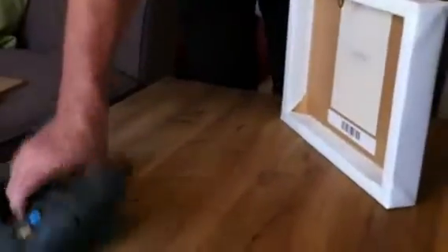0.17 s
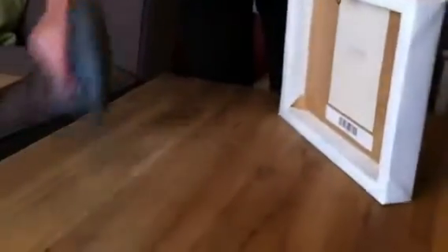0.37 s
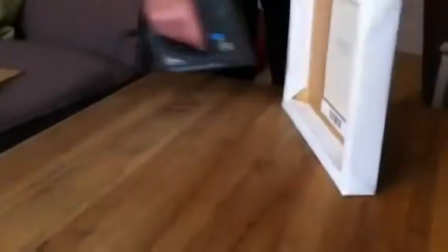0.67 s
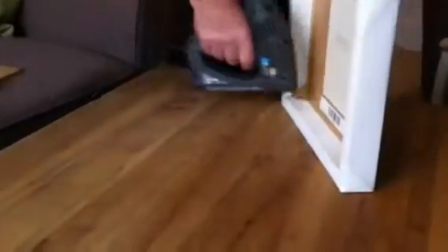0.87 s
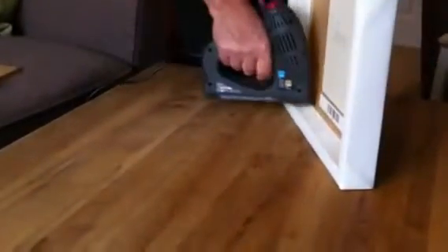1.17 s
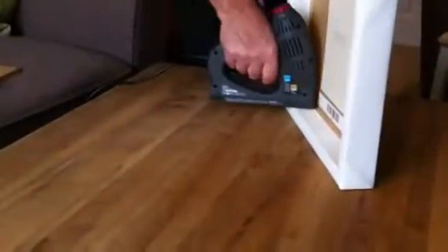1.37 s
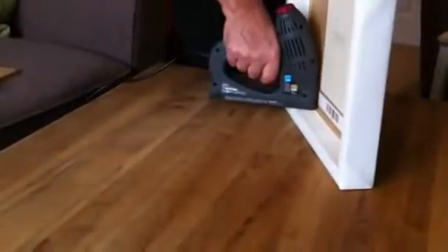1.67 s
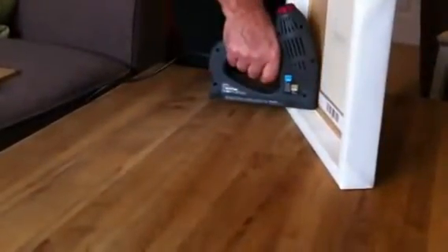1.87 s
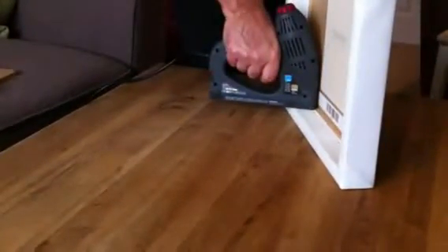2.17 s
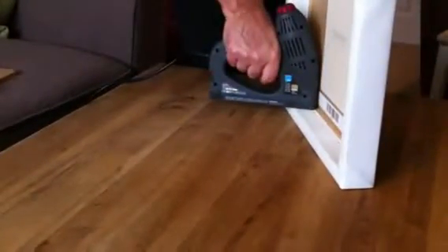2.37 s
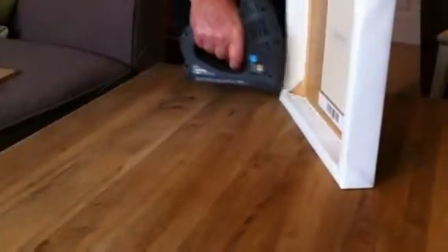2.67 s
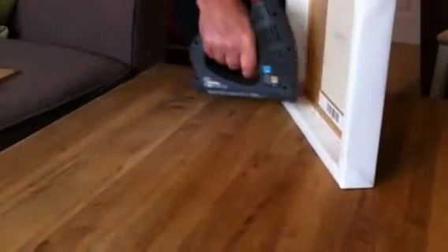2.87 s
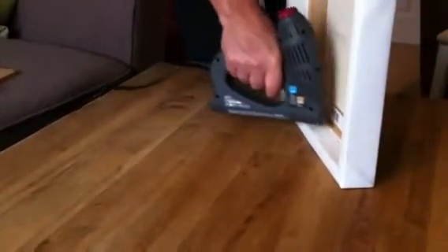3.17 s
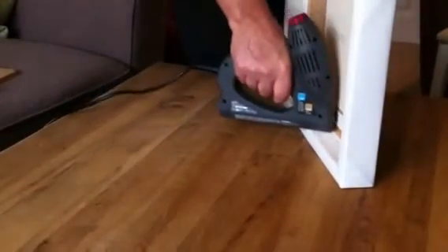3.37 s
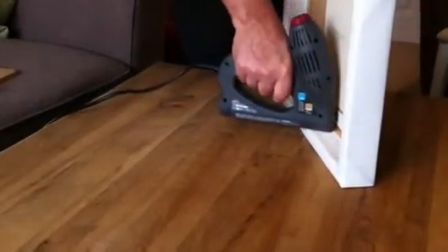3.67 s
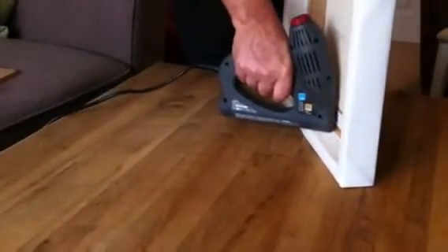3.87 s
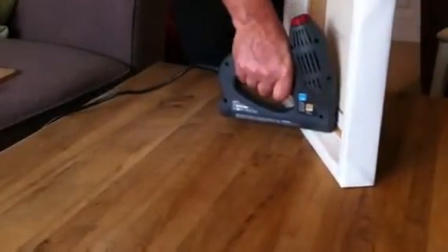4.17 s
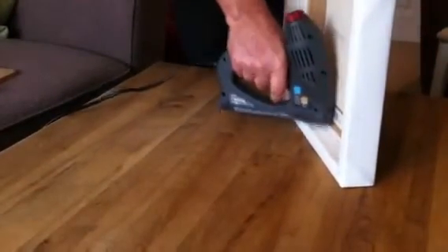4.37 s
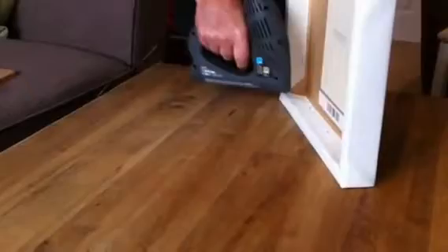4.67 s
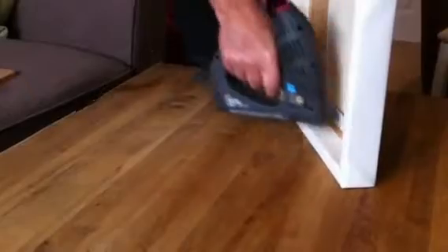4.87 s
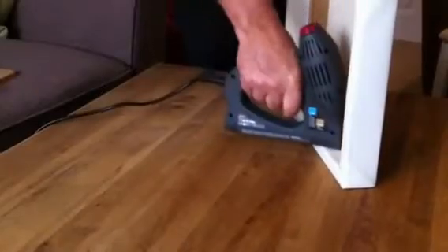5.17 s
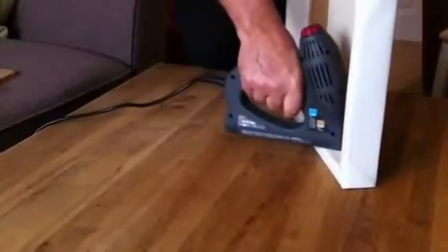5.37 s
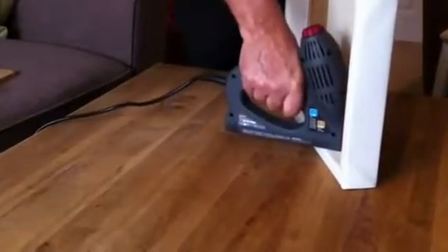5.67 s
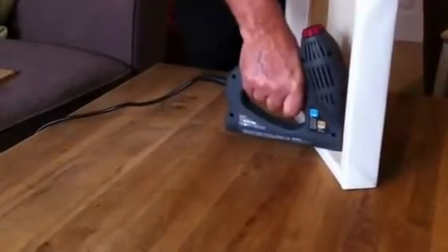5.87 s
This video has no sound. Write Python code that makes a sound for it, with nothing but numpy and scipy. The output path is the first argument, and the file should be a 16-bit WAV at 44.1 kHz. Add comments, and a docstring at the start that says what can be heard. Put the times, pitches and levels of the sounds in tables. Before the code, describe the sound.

An electric staple gun scrapes and knocks off a wooden table, bumps onto a canvas frame, and fires two sharp, loud cracks in a quiet room.

```python
"""Over room air and a faint drone, an electric staple gun judders off a wooden table and knocks once.
A canvas frame then rubs into place: coloured noise. Plastic clacks and switch ticks are short noise bursts.
Three times the nose bumps onto the frame and a two-tone hum follows. In the first two, a staple is fired:
cracks of decaying noise with room echoes, thuds of short low swings, rings of decaying sines.
The recorder's gain ducks when the sound is loud and creeps back."""
import sys
import numpy as np
from scipy import signal
from scipy.fft import rfft, irfft
from scipy.io import wavfile
from scipy.ndimage import uniform_filter1d

SR = 44100
rng = np.random.default_rng(int(sys.argv[2]) if len(sys.argv) > 2 else 0)


def master(y):
    """Save y as 16-bit WAV."""
    cut = np.clip(np.atleast_2d(y).T, -1, 1)
    pcm = np.round(cut * 32767)  # scale
    wavfile.write(sys.argv[1], SR, pcm.astype(np.int16))


N = 265967
TIME_S = np.arange(N) / SR
AGE_S = TIME_S[:SR * 3 // 5]  # time since a blow


def undb(db):
    """Decibels to amplitude gain."""
    return 10 ** (np.asarray(db) / 20)


def unit_energy(x):
    """Scale to an energy of one."""
    return x / np.sqrt(np.sum(x ** 2))


def unit_rms(x):
    """Scale a full-length signal to an rms of one."""
    return unit_energy(x) * np.sqrt(N)


def fade(t60_s):
    """Exponential decay that loses 60 dB in t60_s."""
    return np.exp(-np.log(1000) * AGE_S / t60_s)


def at(points, hz):
    """Read (Hz, value) points on a log-frequency axis."""
    point_hz, value = np.transpose(points)
    return np.interp(np.log(hz + 1), np.log(point_hz), value)


def colour(x, points, size=4096):
    """Minimum-phase filter with the given (Hz, dB) shape, by folding its cepstrum to be causal."""
    gain = undb(at(points, np.fft.rfftfreq(size, 1 / SR)))
    cepstrum = irfft(np.log(gain))
    cepstrum[1:size // 2] *= 2
    cepstrum[size // 2 + 1:] = 0
    impulse = irfft(np.exp(rfft(cepstrum)))
    return signal.fftconvolve(x, impulse)[:len(x)]


def add(track, start_s, sound):
    """Mix a sound into the track at a time."""
    i = int(start_s * SR)
    track[i:i + len(sound)] += sound[:N - i]


# Room decay. Each row: frequency in Hz, t60 in s.
ROOM_DECAY = [(100, 0.45), (500, .32), (1500, 0.27), (4000, 0.27), (8000, 0.23), (14000, 0.24)]


def room(gap_s, build_s):
    """Echoes of one blow: after a short gap they thicken, then each band decays at its own rate."""
    f = np.fft.rfftfreq(len(AGE_S), 1 / SR)
    noise = rfft(rng.standard_normal(len(AGE_S)))
    centres_hz = np.geomspace(100, 16000, 7)
    tail = 0
    for hz, share in zip(centres_hz, np.eye(len(centres_hz))):
        band = irfft(noise * np.interp(f, centres_hz, share), len(AGE_S))
        tail = tail + band * fade(at(ROOM_DECAY, hz))
    return unit_energy(tail * np.clip((AGE_S - gap_s) / build_s, 0, 1))


def dull_db(hz, bright_hz):
    """A softer contact loses what lies above its brightness."""
    return -10 * np.log10(1 + (hz / bright_hz) ** 4)


ROOM_DB = -3  # echoes against the direct crack


def crack(points, t60_s, bright_hz=20000):
    """Crowded, quickly damped modes of a hard contact, as decaying noise, and their echoes."""
    softened = [(hz, db + dull_db(hz, bright_hz)) for hz, db in points]
    direct = unit_energy(rng.standard_normal(len(AGE_S)) * fade(t60_s))
    echoes = undb(ROOM_DB) * room(gap_s=0.0053, build_s=0.0045)
    return unit_energy(colour(direct + echoes, softened))


def ring(modes, scatter_db=0):
    """Decaying modes, neighbours in opposite directions; where the blow lands varies their strengths."""
    luck_db = scatter_db * rng.standard_normal(len(modes))
    total = 0
    for k, (hz, db, t60_s) in enumerate(modes):
        gain = (-1) ** k * undb(db + luck_db[k])
        total = total + gain * fade(t60_s) * np.sin(2 * np.pi * hz * AGE_S)
    return unit_energy(total)


def thud(hz, cycles):
    """A soft push on wood: a swing that builds and dies within a few cycles."""
    turn = hz * AGE_S
    return unit_energy(-turn ** 2 * np.exp(-2 * turn / cycles) * np.sin(2 * np.pi * turn))


def narrow(hz, width_hz):
    """A wavering tone: noise in one sharp resonance, rms one."""
    f = np.fft.rfftfreq(N, 1 / SR)
    resonance = 1 / (1 + ((f - hz) / width_hz) ** 2)
    return unit_rms(irfft(rfft(rng.standard_normal(N)) * resonance, N))


# Colour of the room air. Each row: frequency in Hz, level in dB.
AIR_COLOUR = [(30, -4.5), (70, -3), (110, 2.5), (170, 7), (330, 10.5), (520, 6), (850, 9), (1500, 3.5),
              (3000, -0.5), (8000, -3), (15500, -4.5)]
AIR_DB = -65.5
# Faint low drone. Each row: frequency in Hz, width in Hz, level in dB.
DRONE_TONES = [(166, 11, -79.5), (271, 23, -84), (306, 14, -83.5)]


def background():
    """Steady room air as coloured noise, and a faint low drone of narrow noise bands."""
    air = undb(AIR_DB) * unit_rms(colour(rng.standard_normal(N), AIR_COLOUR))
    return air + sum(undb(db) * narrow(hz, width_hz) for hz, width_hz, db in DRONE_TONES)


def hum(hz, waver_hz, waver_db):
    """A steady tone, rms near one, that wavers a little in pitch and level."""
    knots_s = np.linspace(0, TIME_S[-1], 50)
    drift = np.interp(TIME_S, knots_s, rng.standard_normal(len(knots_s)))
    level = np.interp(TIME_S, knots_s, rng.standard_normal(len(knots_s)))
    phase = 2 * np.pi * np.cumsum(hz + waver_hz * drift) / SR
    return np.sqrt(2) * undb(waver_db * level) * np.sin(phase)


def swell(start_s, end_s, attack_s, release_s):
    """Gain over time: rise from the start, hold until the end, then fall."""
    rise = np.clip((TIME_S - start_s) / attack_s, 0, 1)
    return rise * np.clip(1 - (TIME_S - end_s) / release_s, 0, 1)


# Hum while the gun is held home. Each row: start in s, end in s, lower tone in dB, upper tone in dB.
HOLD_HUMS = [(1.72, 2.321, -84.5, -72.5), (3.51, 4.23, -72.5, -78), (5.51, 6.03, -69.5, -73.5)]
HUM_ATTACK_S, HUM_RELEASE_S = 0.071, .12


def holds():
    """Two low tones hum for as long as the gun is held against the frame."""
    low = hum(hz=137, waver_hz=2, waver_db=1.5)
    high = hum(hz=222, waver_hz=2.3, waver_db=4.0)
    out = np.zeros(N)
    for start_s, end_s, low_db, high_db in HOLD_HUMS:
        tones = undb(low_db) * low + undb(high_db) * high
        out += swell(start_s, end_s, HUM_ATTACK_S, HUM_RELEASE_S) * tones
    return out


def rub(points, rough_db):
    """Sliding friction, rms one: dense tiny slips whose size changes every 128 samples."""
    size_db = rough_db * np.repeat(rng.standard_normal(N // 128 + 1), 128)[:N]
    slips = rng.standard_normal(N) * undb(size_db)
    return unit_rms(colour(slips, points))


# Colour of the frame sliding on the table. Each row: frequency in Hz, level in dB.
SLIDE_SPECTRUM = [(47, -48), (80, -21), (165, -0.5), (267, 0.5), (325, -14.5), (379, 1), (503, -17.5),
                  (909, -2.5), (1290, -16), (1540, -7), (1910, -14), (2330, -14), (7780, -18.5),
                  (15000, -25.5)]
SLIDE_PEAK_S, SLIDE_HALF_S, SLIDE_DB, SLIDE_ROUGH_DB = .615, 0.08, -47.5, 1.8


def slide():
    """The frame rubs over the table, loudest in the middle of one push."""
    push = np.exp(-np.abs((TIME_S - SLIDE_PEAK_S) / SLIDE_HALF_S) ** 3)
    return undb(SLIDE_DB) * push * rub(SLIDE_SPECTRUM, rough_db=SLIDE_ROUGH_DB)


# Boom of the frame and table top. Each row: frequency in Hz, level in dB, t60 in s.
WOOD_BOOM = [(150, 1, .24), (174, 0, .32), (221, -4, .28), (268, 3, .23), (321, 1, .25), (389, -3, .26),
             (444, -10, .3), (597, -9, .23)]
# Colour of a plastic clack. Each row: frequency in Hz, level in dB.
CLACK_COLOUR = [(100, -28.5), (400, -7), (1100, 2.5), (2200, 1), (3000, -4), (4000, -4.5), (6000, -9.5),
                (10000, -17), (16000, -22.5)]


def bump(hz):
    """A soft contact thuds, with a trace of the frame's ring and of the plastic shell."""
    shell = crack(CLACK_COLOUR, t60_s=0.048, bright_hz=1205)
    return thud(hz, cycles=1.11) + undb(-8.5) * ring(WOOD_BOOM) + undb(-26.0) * shell


# Colour of the gun dragging on the table. Each row: frequency in Hz, level in dB.
DRAG_SPECTRUM = [(59, -54), (100, -22.5), (162, -3), (390, -9), (538, -18), (772, -14.5), (1150, -33),
                 (2230, -23.5), (3140, -31), (12000, -41.5), (15600, -76), (22000, -120)]
# the scrape weakens as the hand takes the gun's weight
DRAG_DB, DRAG_FADE_DB_PER_S = -45.5, 62
JUDDER_START_S, JUDDER_PERIOD_S = .008, .045
JUDDER_HZ, STICK_DB = 208, -4.5  # pitch of a slip's thud; drop of the scrape before the next slip
JUDDER_PEAK_S, JUDDER_DB, JUDDER_FALL_DB_PER_S = 0.06, -25.5, 104


def drag(count=4):
    """The gun sticks and slips over the table: thuds at even slips, and a scrape until it knocks."""
    stuck = (TIME_S - JUDDER_START_S) / JUDDER_PERIOD_S % 1
    on_table = TIME_S < KNOCK_HITS[0][0]
    scrape_db = DRAG_DB - DRAG_FADE_DB_PER_S * TIME_S + STICK_DB * stuck
    out = on_table * undb(scrape_db) * rub(DRAG_SPECTRUM, rough_db=1.0)
    for slip_s in JUDDER_START_S + JUDDER_PERIOD_S * np.arange(count):
        slip_db = JUDDER_DB - JUDDER_FALL_DB_PER_S * abs(slip_s - JUDDER_PEAK_S)
        add(out, slip_s, undb(slip_db) * bump(JUDDER_HZ))
    return out


# Knock on the table. Each row: start in s, shell level in dB, table level in dB, brightness in Hz.
KNOCK_HITS = [(0.2496, 3, -16, 16150), (0.2527, 5, 9.5, 3007), (0.2638, -2, -10.5, 6000)]
# Colour of the knock. Each row: frequency in Hz, level in dB.
KNOCK_COLOUR = [(70, -38.5), (110, -24.5), (170, -7), (310, 1), (480, 3), (750, 6), (1100, 0), (1700, -0.5),
                (2800, -5.5), (3700, -10.5), (5000, -6.5), (7000, -9.5), (11000, -10.5), (16000, -24.5)]
# Ring of the knock. Each row: frequency in Hz, level in dB, t60 in s.
KNOCK_RING = [(330, -11.5, 0.13), (439.5, -15.5, .12), (615.5, -6.5, .05), (698.4, 2, 0.022),
              (750, 1.5, 0.03), (847, -15.5, 0.087), (985, -17, .06)]


def knock():
    """The lifted gun knocks on the table: close contacts, each a crack of the shell and a ring."""
    out = np.zeros(N)
    for start_s, shell_db, table_db, bright_hz in KNOCK_HITS:
        shell = undb(shell_db) * crack(KNOCK_COLOUR, t60_s=.032, bright_hz=bright_hz)
        add(out, start_s, shell + undb(table_db) * ring(KNOCK_RING))
    return out


# Clacks of nose and trigger. Each row: start in s, level in dB, brightness in Hz,
# bounce in dB against the clack.
CLACK_HITS = [(0.81, -15, 5450, -9), (2.6134, -16, 6550, -7.5), (3.446, -20, 1560, -4),
              (4.471, -20, 3997, -1.5)]
BOUNCE_S, CLACK_SCATTER_DB = .012, 2.5


def clacks():
    """Plastic parts crack, bounce once and stir the gun's modes."""
    out = np.zeros(N)
    for start_s, db, bright_hz, bounce_db in CLACK_HITS:
        stirred = [(hz, mode_db + dull_db(hz, bright_hz), t60_s) for hz, mode_db, t60_s in GUN_RING]
        for hit_s, hit_db in (start_s, db), (start_s + BOUNCE_S, db + bounce_db):
            plastic = crack(CLACK_COLOUR, t60_s=0.045, bright_hz=bright_hz)
            gun = undb(-9.0) * ring(stirred, scatter_db=CLACK_SCATTER_DB)
            add(out, hit_s, undb(hit_db) * (plastic + gun))
    return out


# Ticks of safety switch and trigger spring. Each row: start in s, level in dB.
TICK_HITS = [(1.474, -23), (2.605, -24), (3.464, -24), (4.49, -21), (5.451, -27)]
# Colour of a tick. Each row: frequency in Hz, level in dB.
TICK_COLOUR = [(300, 0), (1900, -21), (3000, -16), (4600, -10), (5500, -3), (7500, -7.5), (10500, -2.5),
               (12300, -11), (13500, -15), (16000, -39)]


def ticks():
    """Switch and spring tick: short coloured cracks."""
    out = np.zeros(N)
    for start_s, db in TICK_HITS:
        add(out, start_s, undb(db) * crack(TICK_COLOUR, t60_s=0.04))
    return out


# Presses on the frame. Each row: touch in s, touch level in dB, home in s, home level in dB.
NOSE_PRESSES = [(1.37, -24, 1.512, -27), (3.444, -22, 3.556, -23), (5.268, -25.5, 5.484, -11.5)]
TOUCH_HZ, HOME_HZ = 219, 154.3  # pitch of the light and of the firm bump
REBOUND_S, REBOUND_DB = 0.022, -6  # after the touch; against the touch
SETTLE_S, SETTLE_DB = .133, -35.5  # after the nose is home


def presses():
    """The nose touches the frame and rebounds, sinks home, and the frame settles: four soft bumps."""
    out = np.zeros(N)
    for touch_s, touch_db, home_s, home_db in NOSE_PRESSES:
        add(out, touch_s, undb(touch_db) * bump(TOUCH_HZ))
        add(out, touch_s + REBOUND_S, undb(touch_db + REBOUND_DB) * bump(TOUCH_HZ))
        add(out, home_s, undb(home_db) * bump(HOME_HZ))
        add(out, home_s + SETTLE_S, undb(SETTLE_DB) * bump(HOME_HZ))
    return out


HOLLOW_HZ = 750  # centre of the mid tone, which depends on where the nose rests


def hollowed(rows, mid_db):
    """Lift or cut the region around the hollow mid tone in (Hz, dB, ..) rows."""
    return [(hz, db + mid_db * np.exp(-2 * np.log2(hz / HOLLOW_HZ) ** 2), *rest) for hz, db, *rest in rows]


# Shots. Each row: start in s, level in dB, delay until the plunger falls back in s, hollow mid tone in dB.
SHOT_HITS = [(2.3139, 18.5, .0375, 0), (4.2191, 17, .039, -2.5)]
# One stroke: plunger starts, meets the staple, drives it home, rebounds and rattles.
# Each row: time from the hit in s, steel level in dB, brightness in Hz, wood level in dB.
STROKE_CONTACTS = [(-.003, -20.5, 7000, -52), (0.0, -1.5, 7432, -23), (.0033, 2.5, 15980, -6),
                   (.0052, -6, 4970, -18.5), (0.013, -11, 12930, -11.5), (0.0146, -5.5, 10010, -22),
                   (.0178, -5.5, 20190, -17)]
# Colour of the steel driver's crack. Each row: frequency in Hz, level in dB.
STEEL_COLOUR = [(90, -24.5), (250, -2.5), (500, -7.5), (750, 0), (1400, 3.5), (1900, 3), (3300, -2),
                (5500, -2.5), (8500, -1), (12000, -3), (14000, -5), (16000, -9)]
# Ring of the gun's mechanism and shell. Each row: frequency in Hz, level in dB, t60 in s.
GUN_RING = [(696, 1.5, 0.19), (924, -3.5, 0.16), (1044, -0.5, 0.24), (1197, -1.5, 0.053), (1453, -1, .14),
            (1885, 1.5, 0.23), (2050, -5, 0.13), (2264, -0.5, .14), (2440, -0.5, .17), (3180, -5.5, .14),
            (3680, -7.5, 0.12), (4382, 1, .16), (5170, -5.5, 0.22), (6700, -10.5, 0.16), (7750, -4, .13),
            (9400, -7, .13), (9140, -5.5, .16)]


def shots():
    """Each stroke is a quick run of steel cracks and wooden thuds; gun and frame ring on."""
    out = np.zeros(N)
    for shot_s, db, back_s, mid_db in SHOT_HITS:
        for lag_s, steel_db, bright_hz, wood_db in STROKE_CONTACTS:
            steel = crack(hollowed(STEEL_COLOUR, mid_db), t60_s=0.03, bright_hz=bright_hz)
            add(out, shot_s + lag_s, undb(db + steel_db) * steel)
            add(out, shot_s + lag_s, undb(db + wood_db) * thud(hz=242, cycles=.9))
        add(out, shot_s, undb(db - 4.5) * ring(hollowed(GUN_RING, mid_db), scatter_db=1.5))
        add(out, shot_s + .005, undb(db - 2.0) * ring(WOOD_BOOM, scatter_db=3.0))
        # the spring throws the plunger back on its buffer
        add(out, shot_s + back_s, undb(db - 13) * thud(hz=190, cycles=0.63))
    return out


def scene():
    """Quiet room, handling and two shots, heard by one microphone."""
    handling = slide() + drag() + knock() + clacks() + ticks() + presses()
    return (background() + holds() + handling + shots())[None]


def gain_control(x, top_db, recover_db_per_s, window_s):
    """Turn down at once when the sound passes the threshold, then recover slowly."""
    power = uniform_filter1d(x ** 2, int(window_s * SR) + 1)
    over_db = np.maximum(10 * np.log10(np.maximum(power, 1e-12)) - top_db, 0)
    recovered_db = recover_db_per_s * TIME_S
    return x * undb(recovered_db - np.maximum.accumulate(over_db + recovered_db))


MIC_LOW_HZ, TOP_HZ = 84, 15800


def record(dry):
    """A small microphone thins the bass; then gain control, rounded peaks and a steep top cut."""
    high_pass = signal.butter(2, MIC_LOW_HZ, "high", fs=SR, output="sos")
    thin = signal.sosfilt(high_pass, dry[0])
    held = gain_control(thin, top_db=-10.5, recover_db_per_s=2.0, window_s=0.0063)
    rounded = 1.2 * np.tanh(held / 1.2)
    top_cut = signal.ellip(10, .2, 80, TOP_HZ, fs=SR, output="sos")  # 0.2 dB ripple, 80 dB stopband
    return signal.sosfilt(top_cut, rounded)[None]


dry = scene()
out = record(dry)
master(out)
```